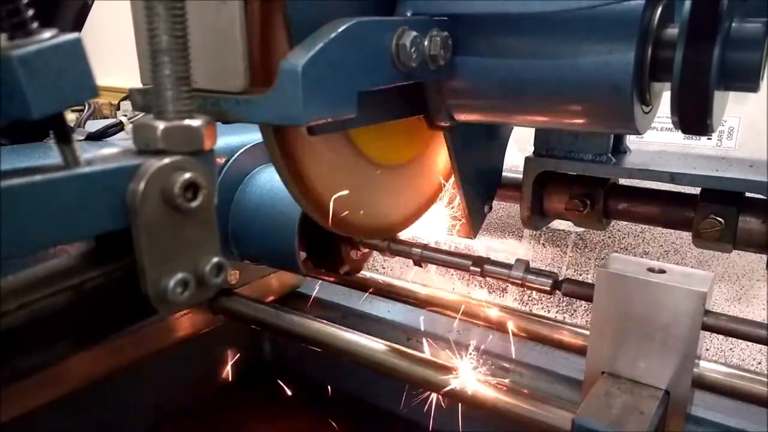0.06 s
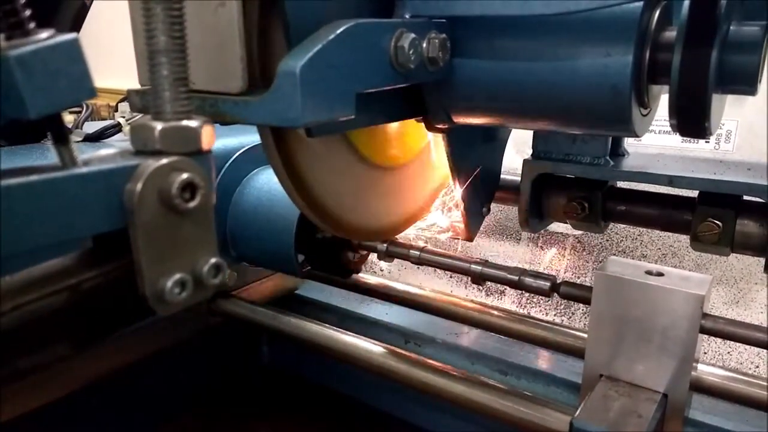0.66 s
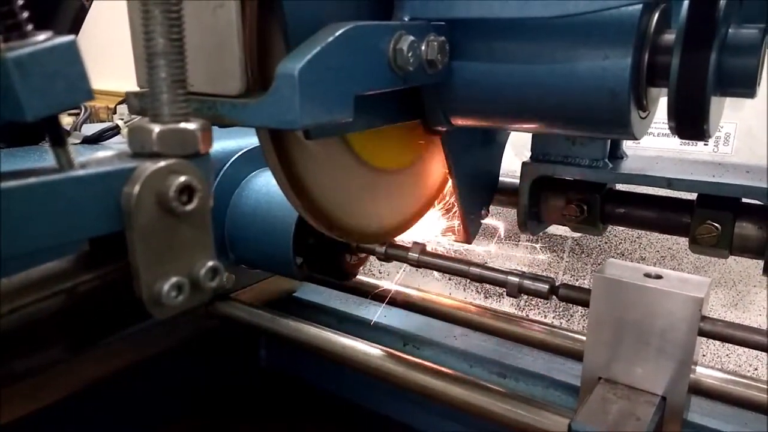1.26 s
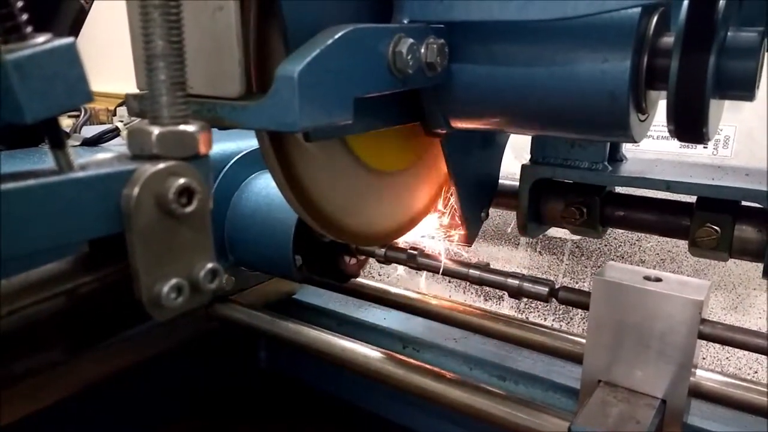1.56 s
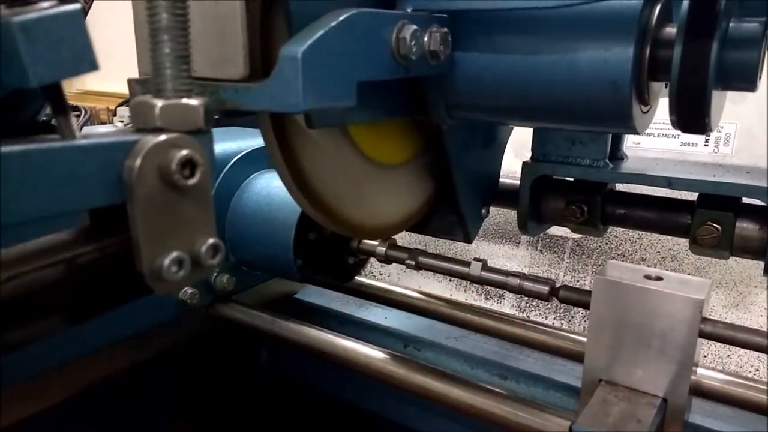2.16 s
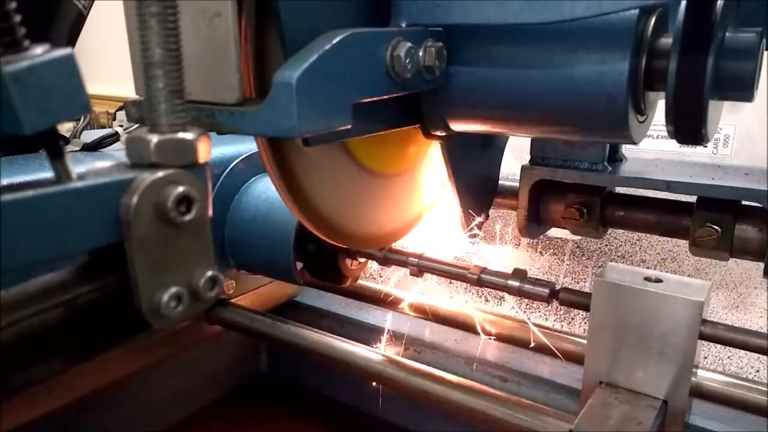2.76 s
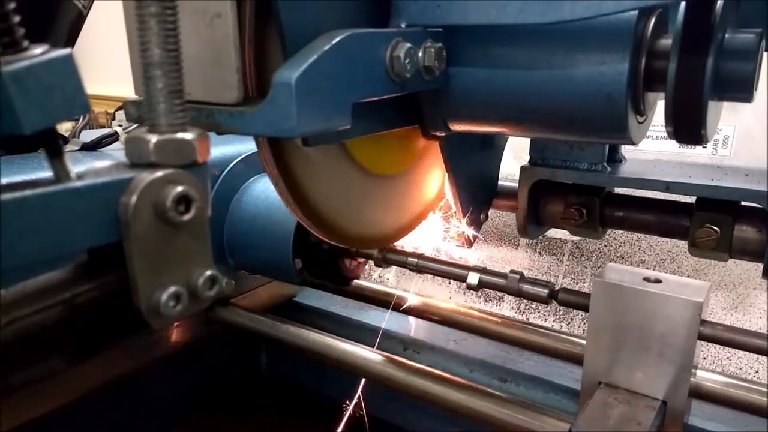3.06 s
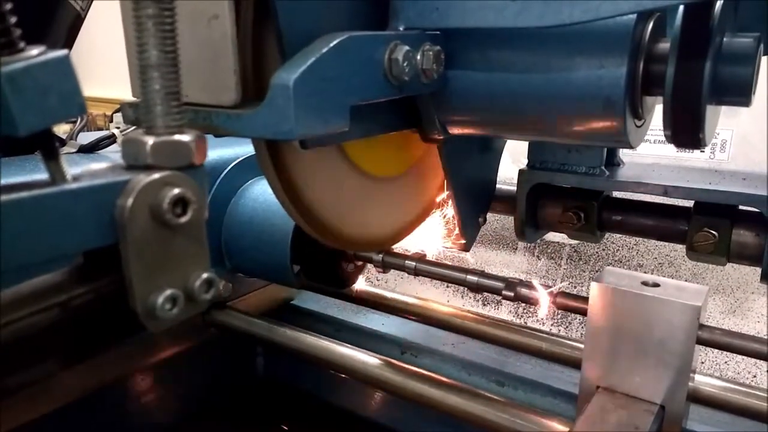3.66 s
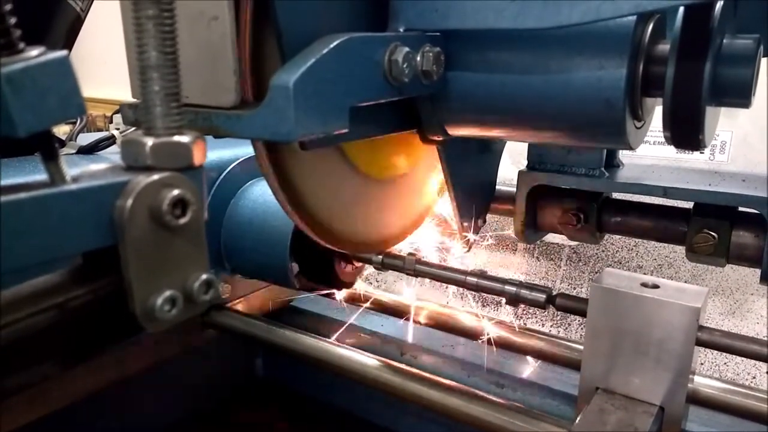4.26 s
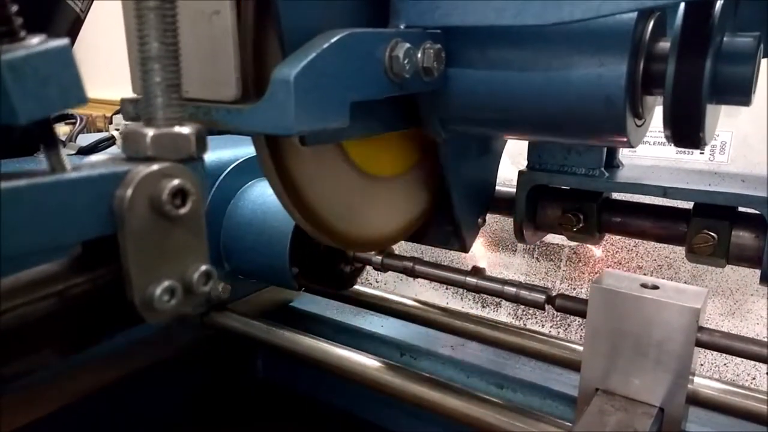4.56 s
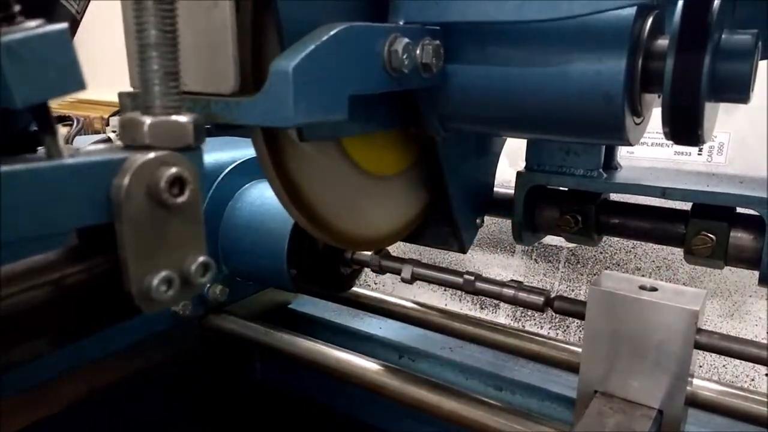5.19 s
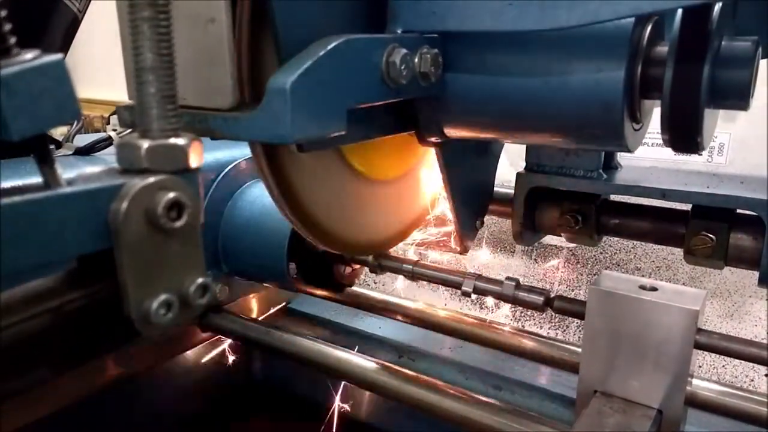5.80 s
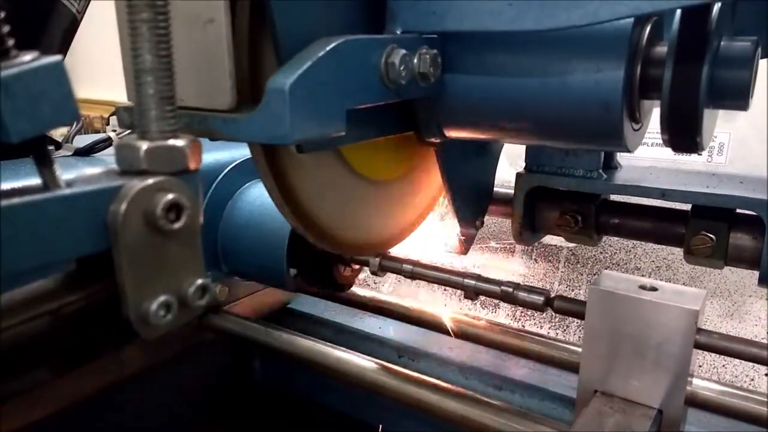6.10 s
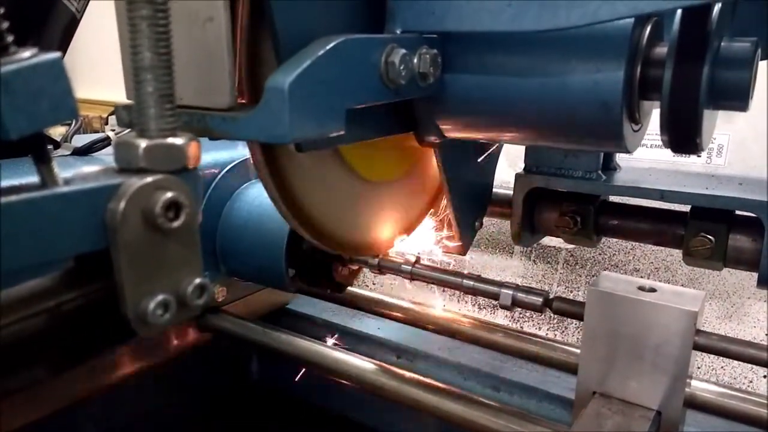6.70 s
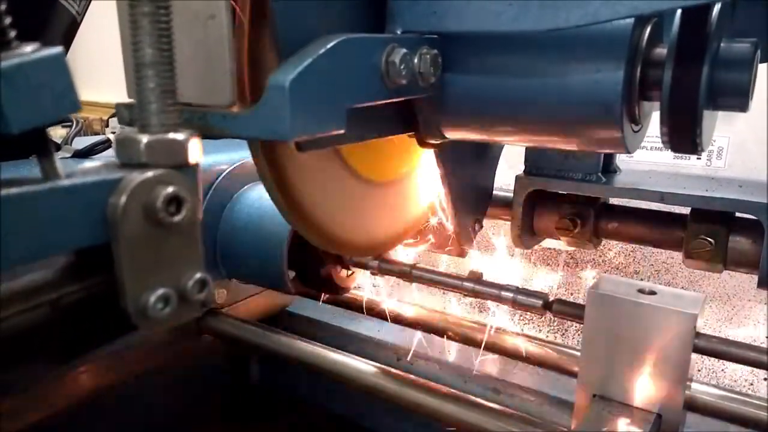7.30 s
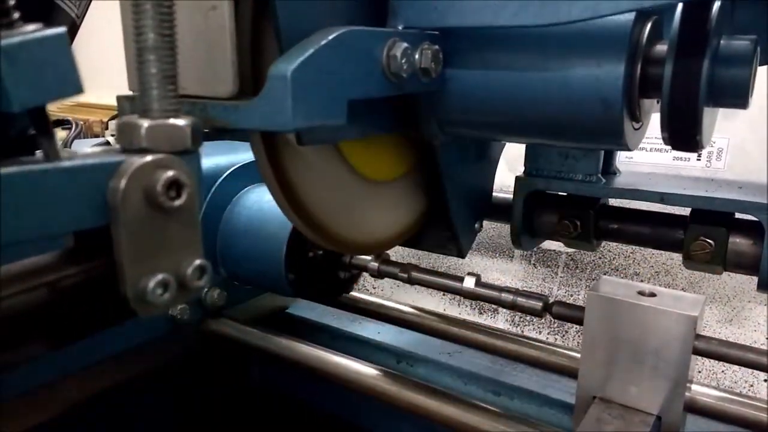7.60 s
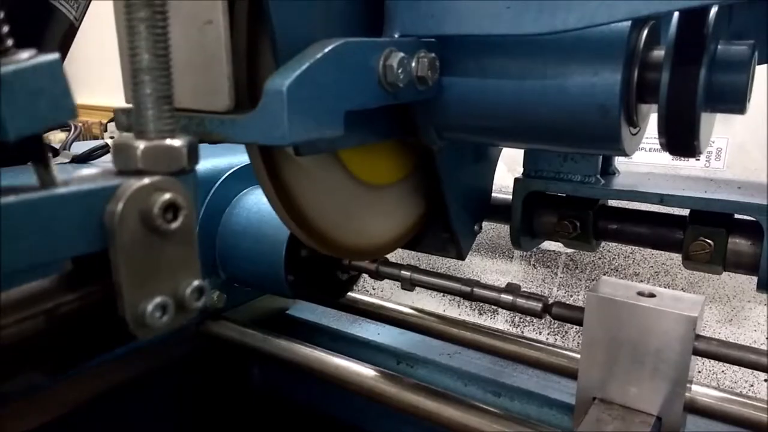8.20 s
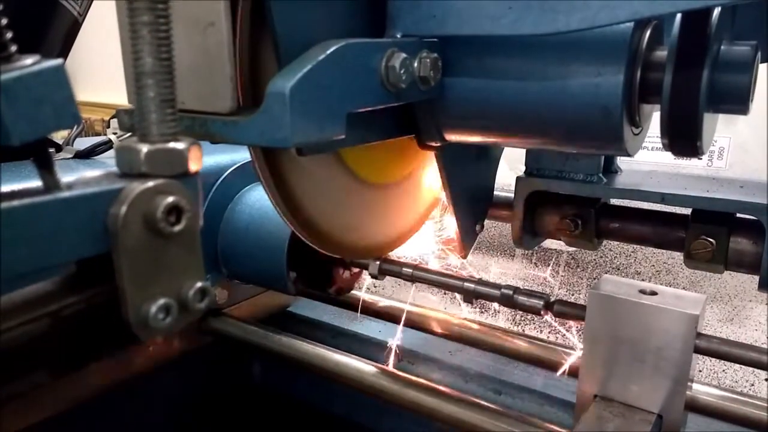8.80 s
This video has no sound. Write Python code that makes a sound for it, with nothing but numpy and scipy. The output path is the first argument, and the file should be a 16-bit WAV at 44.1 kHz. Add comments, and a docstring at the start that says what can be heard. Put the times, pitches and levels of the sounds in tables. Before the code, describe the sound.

Repeated bursts of harsh, pulsing metal grinding with a high ring, separated by short pauses where the machine hums and clatters.

```python
"""A belt-driven grinding wheel makes four passes over a small steel part, close to the microphone.
First the wheel plunges in and rebounds, over a humming motor and a rattling drive.
It bites about 14 times a second: each bite scrapes out grit and sets the steel ringing,
while chips crackle, deep digs screech and coarse grains snag. Then the wheel lifts off, the drive
knocks, and hum and rattle swell as the automatic volume control recovers, until the next pass."""
import sys
import numpy as np
from scipy import signal
from scipy.fft import irfft
from scipy.io import wavfile

SR = 44100
rng = np.random.default_rng(int(sys.argv[2]) if len(sys.argv) > 2 else 0)


def materialize(psi):
    """Save the field psi as 16-bit PCM at rate SR to the path in sys.argv[1].

    A 1-D psi becomes a single channel; in a 2-D psi each row is a channel.
    """
    bounded = np.clip(np.atleast_2d(psi).T, -1, 1)
    quanta = np.round(bounded * 32767).astype(np.int16)
    wavfile.write(sys.argv[1], SR, quanta)


N = 390285
TIME = np.arange(N) / SR
FIRST_TOUCH_S, CYCLE_S, PASS_S = -.008, 2.7653, 1.793  # a pass is the part of a cycle spent grinding
PASS_STARTS_S = np.arange(FIRST_TOUCH_S, N / SR, CYCLE_S)
RISE_SHARE = 0.43  # the share of its length that a contact takes to build up

# Levels are relative. pan_db is left minus right; lead_rad is how far the left wave runs ahead.
# strong notes of the steel part: pitch_hz, fade_by_60_db_s, pan_db, lead_rad
STEEL_NOTES = [(6381, .3, -5, -.4), (8347, .16, -1, -.1), (8847, .17, 2, -.5), (5966, .28, 0, 0)]
# weaker resonances of the part and wheel: pitch_hz, width_hz, level_db, pan_db
PART_RESONANCES = [(2052, 18, 13.5, -3), (2500, 45, 4, -2), (3924, 28, 7, -4), (4260, 30, 13, -12),
                   (4570, 45, 4, -4), (4785, 45, 8, -6), (11030, 16, 21, -1), (11610, 22, 15, -3),
                   (12520, 55, 24, -9), (12690, 110, 13, -7), (12830, 55, 19, -4), (14006, 19, 33.5, -15),
                   (14673, 22, 26.5, -5)]
# resonances of the machine's frame and guard: pitch_hz, width_hz, level_db, pan_db
FRAME_RESONANCES = [(635, 32, 3, -4), (726, 22, 15, -3), (1098, 28, 7, 0), (1128, 30, 8.5, 0),
                    (1256, 13, 15, -1), (1488, 28, 8, -3), (1860, 36, 11, 0), (2245, 55, 5, 0),
                    (2900, 45, 5, -1)]
# resonances of loose drive parts: pitch_hz, width_hz, level_db, pan_db
DRIVE_RESONANCES = [(3843, 40, 10.8, -0.5), (4390, 42, 4.9, -1)]
# tone colour of grit scraping steel: pitch_hz, level_db
GRIT_COLOUR = [(50, -19.5), (170, 2.5), (240, 7), (330, -10.5), (650, 0.5), (1400, -9), (2100, 1),
               (2550, -11.5), (4000, 4), (5500, -5), (6600, 2.5), (7500, -21.5), (9300, 5), (10200, -12.5),
               (11400, -7), (12200, -27.5), (13300, -22), (14500, -19.5), (15300, -32)]
# tone colour of small hard hits: pitch_hz, level_db
CLACK_COLOUR = [(80, -38), (250, -21), (1200, -4), (2500, 0), (4000, 5), (6000, -7), (8600, -11.5),
                (11000, -21.5), (15000, -41)]
# bites of the wheel: start_s, length_s, grit_db, then one level_db for each steel note
BITES = [(-0.014, 0.095, -9.5, -22, -23, -28, -32), (0.114, 0.042, -11.5, -18, -15.5, -17, -34),
         (0.206, 0.022, -8, -17.5, -15, -22.0, -27), (0.276, 0.034, -13, -19, -14, -15, -39),
         (0.335, 0.048, -13.5, -20.5, -18, -22, -30), (0.415, 0.034, -15.5, -15, -27.0, -25, -26),
         (0.431, 0.082, -15, -22.5, -18, -19, -33), (0.541, 0.022, -10, -18, -19, -21, -37),
         (0.591, 0.063, -15, -26, -21, -23, -34), (0.675, 0.059, -11.5, -20.5, -22, -32, -32),
         (0.739, 0.062, -13, -28.0, -15.5, -34, -33), (0.804, 0.047, -12, -26, -24, -21.5, -34),
         (0.876, 0.064, -13.5, -18, -18, -23, -36), (0.938, 0.083, -12, -22.5, -17, -25, -29),
         (1.013, 0.071, -13, -23, -23.5, -23, -23), (1.103, 0.015, -13, -21.0, -22, -26, -31),
         (1.125, 0.063, -16.5, -13, -17, -20, -33), (1.215, 0.065, -15.5, -22, -19.5, -24, -30),
         (1.295, 0.056, -13, -15, -23, -22, -25), (1.367, 0.066, -11, -16, -15.5, -24, -44),
         (1.444, 0.045, -12, -18.5, -26, -20, -47), (1.522, 0.031, -12, -23, -18, -26, -26),
         (1.552, 0.074, -13, -19.5, -17.5, -18, -35), (1.651, 0.031, -12, -28, -18.5, -20, -29),
         (1.705, 0.066, -12, -21.5, -23, -25, -29), (2.775, 0.07, -12, -17, -20.5, -24, -23),
         (2.893, 0.049, -11.5, -19, -29, -28, -26), (2.964, 0.052, -15.5, -19, -20.5, -27, -36),
         (3.035, 0.043, -12, -31, -23, -24, -36), (3.082, 0.05, -14, -14.5, -20, -29, -26),
         (3.161, 0.039, -11, -17, -23, -21, -34), (3.245, 0.03, -14.5, -26, -23, -22, -26),
         (3.297, 0.032, -11, -18, -32, -25, -33), (3.347, 0.022, -16.5, -24, -19, -27, -36),
         (3.388, 0.015, -10, -19.5, -26.0, -37, -28), (3.409, 0.043, -12.5, -22, -26, -24.5, -36),
         (3.452, 0.031, -11, -17, -20, -30, -27), (3.504, 0.057, -12.5, -18, -25, -36, -30),
         (3.582, 0.065, -14, -23, -19, -29.5, -25), (3.662, 0.035, -11, -19, -17, -19, -29),
         (3.718, 0.057, -12.5, -20, -16, -20, -34), (3.784, 0.035, -11.5, -16.0, -23, -21.0, -28),
         (3.864, 0.023, -11, -14, -19, -19, -37), (3.93, 0.053, -17, -19.5, -21, -24, -37),
         (4.009, 0.012, -13, -13, -25, -20, -35), (4.031, 0.08, -12, -16, -22, -35, -34),
         (4.109, 0.067, -11.5, -16, -24, -24, -25), (4.204, 0.017, -10.5, -21, -31, -28, -34),
         (4.249, 0.0067, -11, -15, -19, -19, -43), (4.266, 0.053, -11, -23, -24.0, -22, -36),
         (4.341, 0.05, -10, -17.5, -15.5, -31, -32), (4.417, 0.025, -10, -31, -18, -22, -30),
         (4.447, 0.11, -11.5, -26, -17, -20, -32), (5.512, 0.1, -12.5, -17.5, -19.5, -23, -32),
         (5.654, 0.022, -12.5, -21, -21, -24, -25), (5.727, 0.034, -13, -17, -20, -23, -24),
         (5.795, 0.039, -11.5, -20, -20, -21, -29), (5.86, 0.059, -11.5, -21, -20, -20, -33),
         (5.929, 0.031, -10.5, -31, -22, -23, -41), (5.978, 0.05, -13, -17.5, -26.0, -16.5, -33),
         (6.08, 0.017, -14.5, -20, -21.5, -23, -37), (6.128, 0.062, -12.5, -17.5, -29.5, -20.5, -36),
         (6.222, 0.031, -16, -17.5, -30, -18, -23), (6.281, 0.078, -12.5, -19, -18, -22.5, -28),
         (6.362, 0.1, -11, -18, -25, -18.5, -37), (6.438, 0.024, -21, -18.5, -27, -20, -33),
         (6.474, 0.063, -10, -17.5, -20, -19.5, -30), (6.553, 0.026, -10, -14.5, -26, -16, -34),
         (6.585, 0.082, -15, -14, -32, -27, -38), (6.678, 0.021, -11, -16, -22, -19, -40),
         (6.698, 0.055, -14, -17, -23, -39, -32), (6.765, 0.028, -10, -17.5, -22, -22, -32),
         (6.841, 0.015, -10.5, -13, -21, -17, -28), (6.898, 0.037, -11, -15.5, -20, -18, -32),
         (6.977, 0.066, -12.5, -14.5, -26, -18.5, -25), (7.054, 0.028, -11.5, -19, -28, -25.0, -27),
         (7.107, 0.046, -12.5, -20.5, -31, -20, -32), (7.183, 0.019, -10.5, -15.5, -20.5, -20, -32),
         (7.254, 0.0096, -7, -17, -20, -23, -32), (7.272, 0.048, -11, -15.5, -15, -23, -28),
         (8.274, 0.099, -11, -18, -17, -24, -28), (8.413, 0.049, -13, -20, -21, -23, -31),
         (8.49, 0.072, -13, -17.5, -19.5, -20, -31), (8.568, 0.037, -13, -28, -17.5, -20, -32),
         (8.63, 0.049, -15, -23, -19, -25, -24), (8.694, 0.042, -15, -20, -18.5, -23, -31),
         (8.77, 0.035, -12.5, -25, -15, -24.5, -35), (8.817, 0.033, -9.5, -25.5, -21, -27, -37)]


def amp(db):
    """Turns decibels into a multiplier."""
    return 10 ** (np.asarray(db) / 20)


def evened(x):
    """Scales a signal to an average power of 1."""
    return x / np.sqrt(np.mean(abs(x) ** 2) + 1e-20)


def drift(hz):
    """A random wander in complex numbers, no faster than about hz."""
    slow_only = np.exp(-(np.fft.fftfreq(N, 1 / SR) / hz) ** 2)
    noise = rng.standard_normal(N) + 1j * rng.standard_normal(N)
    return evened(np.fft.ifft(slow_only * noise))


def smoothed(x, seconds, start):
    """Follows x with a lag, from a starting value."""
    keep = np.exp(-1 / (seconds * SR))
    return signal.lfilter([1 - keep], [1, -keep], x, zi=[keep * start])[0]


def stereo(pan_db, lead_rad):
    """Left and right multipliers; their complex angle shifts the wave's phase."""
    side = np.array([[.5], [-.5]])
    return evened(amp(side * pan_db)) * np.exp(1j * side * lead_rad)


def resonate(force, colour, resonances, pan_db, size=16384):
    """Turns a force into sound: a broad tone colour with ringing peaks on top."""
    # left-right phase, opposite near 2 and 5 kHz: pitch_hz, lead_rad
    phase_leads = [(250, .1), (550, .4), (800, 0), (1550, -.1), (1700, -2.1), (2100, -2.5), (2950, -3.6),
                   (3100, -.1), (3900, .3), (4100, -1.1), (4350, -1.1), (4600, -2.8), (5200, -3.5),
                   (5500, 0), (9000, -.5), (10400, -2), (11000, 0), (12500, -1), (14000, -1.6), (14700, 0)]
    hz = np.fft.rfftfreq(size, 1 / SR)
    points_hz, db = np.transpose(colour)
    log_gain = np.log(amp(np.interp(np.log(hz + 1), np.log(points_hz), db)))
    mirrored = np.r_[log_gain, log_gain[-2:0:-1]]
    broad = np.exp(np.conj(signal.hilbert(mirrored)))[:len(hz)]  # the sound follows its cause
    peaks = sum(amp(peak_db) * stereo(pan, 0) / (1 + 2j * (hz - pitch) / width)
                for pitch, width, peak_db, pan in resonances)
    phase = stereo(0, np.interp(hz, *np.transpose(phase_leads)))
    response = irfft(broad * (stereo(pan_db, 0) + peaks) * phase)
    early = size // 16  # room for the side that hears a pitch first
    response = evened(np.roll(response, early, axis=1)) / np.sqrt(size)
    return signal.oaconvolve(force, response, axes=1)[:, early:early + N]


def grains(per_s, spread_db, apart):
    """Tiny random hits of uneven size; apart weights those that reach one side only."""
    sizes = amp(spread_db * np.minimum(rng.exponential(1, (3, N)), 4)) * rng.standard_normal((3, N))
    shared, left, right = sizes * (rng.random((3, N)) < per_s / SR)
    return evened(shared + apart * np.array([left, right]))


def stroke(age_s, rise_s, length_s, fall_s):
    """The strength of one contact: it rises, holds and dies away."""
    return np.clip(age_s / rise_s, 0, 1) * np.exp(-np.maximum(age_s - length_s, 0) / fall_s)


def after(start_s, seconds):
    """The samples that follow a moment."""
    return slice(max(int(start_s * SR), 0), int((start_s + seconds) * SR))


def contact(rise_s, fall_s):
    """1 while the wheel is on the steel, 0 between passes."""
    return sum(stroke(TIME - start, rise_s, PASS_S, fall_s) for start in PASS_STARTS_S)


def blows(rows, longest_rise_s, fall_s):
    """The joint strength of many contacts, given as start_s, length_s, level_db."""
    power = np.zeros(N)
    for start, length, db in rows:
        span = after(start, .5)
        rise_s = min(RISE_SHARE * length, longest_rise_s)
        power[span] += (amp(db) * stroke(TIME[span] - start, rise_s, length, fall_s)) ** 2
    return np.sqrt(power)


def motor(waver=0.031, dip_width_s=0.063):
    """Magnetic hum: firm when idling, thinner while the wheel loads the motor."""
    # tones of the hum: pitch_hz, level_db, change_under_load_db, pan_db, lead_rad
    hum_tones = [(100.4, -24, -4, -17.5, 2.13), (201.3, -20.5, -7, -6, 0.02), (378.6, -51.5, 9.5, 4, 0.15)]
    load = contact(rise_s=0.14, fall_s=0.17)
    # the hum dips briefly after the plunge and at lift-off
    dip_db = sum(db * np.exp(-((TIME - start - delay_s) / dip_width_s) ** 2)
                 for start in PASS_STARTS_S for delay_s, db in [(.14, -5.5), (1.81, -8)])
    hum = np.zeros((2, N))
    for hz, db, load_db, pan, lead in hum_tones:
        tone = np.exp(2j * np.pi * hz * TIME) * (1 + waver * drift(13))
        hum += amp(db + load_db * load) * (stereo(pan, lead) * tone).real
    return np.sqrt(2) * amp(dip_db) * hum


def rattle(level_db=-21, lumpy_db=2):
    """Belt and bearings chatter in the frame without a pause."""
    # tone colour of the chatter: pitch_hz, level_db
    rattle_colour = [(30, -7.5), (60, -4.5), (125, 12), (240, 13), (310, -0.5), (470, 3), (600, 2),
                     (900, -1.5), (1400, -1), (2200, -4), (3300, -5.5), (4200, -8.5), (6000, -16),
                     (8600, -20), (11000, -30), (15000, -41)]
    force = evened(grains(per_s=5000, spread_db=2.83, apart=0.51) * amp(lumpy_db * drift(37).real))
    return amp(level_db) * resonate(force, rattle_colour, FRAME_RESONANCES + DRIVE_RESONANCES, pan_db=-2)


def grinding(rub_db=-21, rebound_db=-10.5, settle_s=0.15, graze_db=-29.5, graze_s=0.039, fall_s=0.0085):
    """The wheel grazes, plunges in, rebounds and bites; its pressure drives scrape, shudder and screech."""
    # moments when the wheel digs in deep: start_s, length_s, level_db
    digs = [(0.008, 0.04, -21), (0.416, 0.015, -11.5), (1.535, 0.019, -12), (1.733, 0.056, -14.5),
            (2.815, 0.027, -6), (3.177, 0.022, -16), (3.671, 0.04, -10), (3.731, 0.025, -16),
            (4.081, 0.019, -20), (4.353, 0.033, -18), (5.522, 0.065, -16), (5.877, 0.035, -17),
            (6.318, 0.022, -12), (6.387, 0.03, -21), (6.44, 0.021, -24), (7.062, 0.023, -11.5),
            (7.118, 0.036, -12), (7.275, 0.02, -5), (8.29, 0.024, -22), (8.524, 0.025, -14.0),
            (8.777, 0.03, -15.0)]
    graze = sum(amp(graze_db) * stroke(TIME - start + graze_s, 0.012, graze_s, fall_s)
                for start in PASS_STARTS_S)
    rebound = np.exp(-((TIME - FIRST_TOUCH_S) % CYCLE_S / settle_s) ** 2)
    rub = amp(rub_db + rebound_db * rebound) * contact(0.0037, fall_s)
    bite = blows([row[:3] for row in BITES], longest_rise_s=.016, fall_s=fall_s)
    dig = blows(digs, longest_rise_s=.016, fall_s=fall_s)
    power = graze ** 2 + rub ** 2 + bite ** 2
    # strain grows with the square of the pressure, so only heavy bites and digs count
    strain = np.hypot(power, amp(-9) * dig)
    screech_force = np.hypot(amp(2) * power, amp(-2) * dig)
    return scrape(np.sqrt(power)) + shudder(strain) + rasp(strain) + screech(screech_force)


def scrape(pressure, level_db=-3, wheel_turns_per_s=43.8, wobble=0.12, flutter_db=2.3):
    """Grit scratches the steel; the wheel runs slightly out of true, so it throbs once a turn."""
    throb = 1 + wobble * np.sin(2 * np.pi * wheel_turns_per_s * TIME)
    flutter = amp(flutter_db * drift(130).real)
    force = pressure * throb * flutter * grains(per_s=30000, spread_db=1.33, apart=0.98)
    return amp(level_db) * resonate(force, GRIT_COLOUR, FRAME_RESONANCES + PART_RESONANCES, pan_db=-2.5)


def shudder(strain, level_db=-2):
    """Heavy bites and digs shake the machine's frame."""
    # tone colour of the shaking frame: pitch_hz, level_db
    shudder_colour = [(50, -44), (140, 18), (260, -10.5), (750, 9.5), (1300, -4), (2400, 6.5), (4100, -2.5),
                      (6000, -23), (15000, -38)]
    force = strain * grains(per_s=8000, spread_db=2.1, apart=0.2)
    return amp(level_db) * resonate(force, shudder_colour, FRAME_RESONANCES + PART_RESONANCES, pan_db=3)


def ringing(level_db=0.18, roughness=0.56, detune_hz=4, damping_s=0.035, hold_s=0.01):
    """Each bite damps the old ring and starts a new one; after a pass the steel rings out freely."""
    out = np.zeros((2, N))
    next_starts = [row[0] for row in BITES[1:]] + [np.inf]
    for k, (hz, fade_s, pan, lead) in enumerate(STEEL_NOTES):
        note = np.zeros(N, complex)
        touching = np.zeros(N)
        for (start, length, _, *notes_db), next_start in zip(BITES, next_starts):
            phase, shift = rng.uniform(-0.27, 1, 2)
            span = after(start, .5)
            age = TIME[span] - start
            ring = stroke(age, RISE_SHARE * length, length + hold_s, fade_s / np.log(1000))
            ring *= np.exp(-np.maximum(TIME[span] - next_start, 0) / damping_s)
            tone = np.exp(1j * np.pi * (phase + 2 * (hz + detune_hz * shift) * age))
            note[span] += amp(notes_db[k]) * ring * tone
            touching[span] += stroke(age, 0.00085, length, 0.0032)
        note *= 1 + roughness * np.minimum(touching, 1) * drift(52)  # touching grit roughens the note
        out += np.sqrt(2) * (stereo(pan, lead) * note).real
    return amp(level_db) * out


def chips(level_db=-28):
    """Chips and loose grit crackle against the guard while the wheel cuts."""
    force = contact(rise_s=0.004, fall_s=0.0087) * grains(per_s=130, spread_db=3.5, apart=1)
    return amp(level_db) * resonate(force, CLACK_COLOUR, FRAME_RESONANCES, pan_db=3)


def rasp(strain, level_db=-1):
    """Under strain the part gives a harsh noise around the pitch of its screech."""
    # resonances near the screech: pitch_hz, width_hz, level_db, pan_db
    rasp_resonances = [(3930, 50, 12, -4), (4130, 90, 7, -6), (4263, 26, 17, -12)]
    force = strain * grains(per_s=8000, spread_db=2, apart=0.87)
    return amp(level_db) * resonate(force, GRIT_COLOUR, rasp_resonances, pan_db=17)


def screech(force, roughness=0.46, wander_hz=6, ring_s=0.0061):
    """The wheel forces out the part's lowest strong note: rough, unsteady, ringing on briefly."""
    # the screeching note: pitch_hz, pan_db, lead_rad
    screech_note = (4261, -9, -1.1)
    hz, pan, lead = screech_note
    cycles = np.cumsum(hz + wander_hz * drift(19.9).real) / SR
    swell = np.sqrt(smoothed(force ** 2, ring_s, 0))
    note = swell * evened(1 + roughness * drift(66)) * np.exp(2j * np.pi * cycles)
    return np.sqrt(2) * (stereo(pan, lead) * note).real


def snags(level_db=-8, ping_db=15, ping_width_hz=16):
    """A coarse grain catches on the steel, making a sudden bright scratch and pinging its notes."""
    # snagging grains, mostly as a bite begins: start_s, level_db
    snag_moments = [(0.128, -4), (0.209, -8), (0.281, -9), (0.418, -6), (0.449, -12), (0.545, -11),
                    (0.594, -10), (0.692, -12), (0.834, -7), (0.905, -21), (0.96, -25), (1.071, -14),
                    (1.141, -11), (1.166, -5), (1.212, -3), (1.24, -15), (1.284, -14), (1.309, -15),
                    (1.381, -5), (1.451, -9), (1.501, -3.5), (1.651, -7), (1.734, -15), (2.762, -7),
                    (2.893, -2.5), (2.971, -20), (3.042, -13), (3.111, -8.5), (3.171, -7), (3.35, -11),
                    (3.422, -15), (3.448, -15), (3.516, -4), (3.586, -11), (3.638, -11), (3.67, -17),
                    (3.803, -12), (3.861, -12), (3.931, -9), (4.182, -9), (4.21, -8), (4.252, -11),
                    (4.288, -7), (4.35, -8), (4.494, -5), (5.516, -9), (5.655, -7), (5.727, -8),
                    (5.824, -14), (5.945, -8), (6.065, -7), (6.136, -18), (6.226, -10), (6.255, -5),
                    (6.327, -9), (6.423, -4), (6.492, -15), (6.563, -7), (6.634, -2), (6.672, -10),
                    (6.767, -7), (6.847, -8), (6.922, -5), (6.98, -13), (7.017, -6), (7.065, -5),
                    (7.138, -8), (7.184, -6), (7.254, -8), (8.282, -6), (8.42, -12), (8.575, -6),
                    (8.645, -9), (8.703, -7), (8.741, -10), (8.777, -7)]
    # tone colour of the scratch: pitch_hz, level_db
    scratch_colour = [(100, -20), (700, -2), (2000, -8), (4000, 2.5), (5500, 0), (7500, -12.5), (9300, 10),
                      (10200, -7), (11400, -3.5), (12200, -20), (13300, -16), (14500, -15), (15300, -24)]
    power = np.zeros(N)
    for start, db in snag_moments:
        span = after(start, .2)
        catch = stroke(TIME[span] - start, rise_s=.001, length_s=0.0058, fall_s=0.016)
        power[span] += (amp(db) * catch) ** 2
    force = np.sqrt(power) * grains(per_s=20000, spread_db=1.5, apart=0.91)
    pings = [(hz, ping_width_hz, ping_db, pan) for hz, _, pan, _ in STEEL_NOTES]
    return amp(level_db) * resonate(force, scratch_colour, PART_RESONANCES + pings, pan_db=0.5)


def knocks(clatter_db=-10, thud_db=-6.5, fall_s=0.0097):
    """Slack in the drive is taken up in short blows: loose parts clatter and the frame thuds."""
    # blows between passes: start_s, length_s, clatter_db, thud_db
    hits = [(1.838, 0.011, -12.5, -19), (1.921, 0.011, -13.5, -12), (1.953, 0.034, -20, -23),
            (1.992, 0.0057, -5, -9), (2.022, 0.0049, -13, -16), (2.048, 0.015, -13, -19),
            (2.102, 0.006, -15, -10.5), (2.168, 0.0097, -7.5, -10), (2.21, 0.0072, -14, -14),
            (2.241, 0.018, -9.5, -10), (2.308, 0.0097, -13, -17), (2.335, 0.018, -12.5, -11),
            (2.404, 0.01, -6, -10), (2.452, 0.016, -16, -14.5), (2.469, 0.007, -7.5, -18),
            (2.504, 0.03, -16.5, -16), (2.566, 0.02, -14.5, -14), (2.587, 0.024, -14, -13),
            (2.663, 0.012, -8.5, -5.5), (2.74, 0.006, -6, -9.5), (4.66, 0.018, -16, -15),
            (4.804, 0.018, -13, -14), (4.88, 0.026, -10, -9.5), (4.928, 0.016, -20, -12.5),
            (4.958, 0.02, -9, -15), (5.001, 0.01, -10, -11), (5.045, 0.008, -12, -19.5),
            (5.064, 0.025, -13.5, -17), (5.088, 0.014, -10, -14), (5.131, 0.023, -15, -12),
            (5.164, 0.005, -9, -10), (5.219, 0.026, -10.5, -10), (5.305, 0.0046, -2, -5.5),
            (5.33, 0.011, -15, -13.5), (5.375, 0.007, -4, -5), (5.407, 0.018, -10.5, -11.5),
            (5.455, 0.008, -9, -9), (5.475, 0.016, -11, -13), (5.497, 0.006, -8, -8),
            (7.402, 0.01, -9, -17), (7.432, 0.043, -11.5, -11.5), (7.503, 0.018, -21, -25),
            (7.521, 0.011, -13, -16), (7.54, 0.008, -13, -21), (7.578, 0.032, -12, -12.5),
            (7.648, 0.024, -15, -25), (7.702, 0.008, -11.5, -14), (7.73, 0.011, -17, -18),
            (7.775, 0.011, -12, -13), (7.804, 0.0055, -13, -17), (7.846, 0.032, -14.5, -12),
            (7.936, 0.0064, -8, -9), (7.973, 0.0089, -16, -14), (7.994, 0.011, -9, -9),
            (8.046, 0.0096, -10, -7), (8.082, 0.0062, -16, -12), (8.109, 0.0031, -14, -9),
            (8.182, 0.016, -9, -8.5), (8.224, 0.015, -13, -19), (8.252, 0.013, -6, -5.5)]
    # tone colour of the frame's thud: pitch_hz, level_db
    thud_colour = [(50, -22), (130, 8), (240, 4.5), (330, 0), (700, -0.5), (1300, -1), (2200, 4.5),
                   (4000, -30), (15000, -73)]
    clatter_force = blows([row[:3] for row in hits], 0.0032, fall_s)
    clatter_force = clatter_force * grains(per_s=11000, spread_db=3.7, apart=1)
    thud_force = blows([(start, length, db) for start, length, _, db in hits], 0.0054, fall_s)
    thud_force = thud_force * grains(per_s=9000, spread_db=1.8, apart=0.14)
    clatter = resonate(clatter_force, CLACK_COLOUR, FRAME_RESONANCES + DRIVE_RESONANCES, pan_db=-2.5)
    thud = resonate(thud_force, thud_colour, FRAME_RESONANCES, pan_db=-2.5)
    return amp(clatter_db) * clatter + amp(thud_db) * thud


def workshop(sound, fade_s=.35, cutoff_hz=4000):
    """The room's short, dull echo, different on each side."""
    t = TIME[:SR // 2]
    tail = rng.standard_normal((2, len(t))) * amp(-60 * t / fade_s) * (t > .004)
    tail = signal.lfilter(*signal.butter(1, cutoff_hz, fs=SR), evened(tail) / np.sqrt(len(t)))
    return signal.oaconvolve(sound, tail, axes=1)[:, :N]


def scene(room_db=-13):
    """The machine at arm's length in a small workshop."""
    noises = grinding() + snags() + chips() + rattle() + knocks()
    return noises + amp(room_db) * workshop(noises) + ringing() + motor()


def record(dry, threshold_db=-32, slope=0.5, attack_s=0.037, recover_s=0.95, gain_db=-7, top_hz=15350):
    """Loud treble turns the volume down until it recovers; the lowest and highest pitches are cut."""
    treble = signal.sosfilt(signal.butter(6, 3000, "high", fs=SR, output="sos"), dry)
    treble_db = 10 * np.log10(smoothed((treble ** 2).mean(0), .02, 0) + 1e-12)
    cut_db = slope * np.maximum(treble_db - threshold_db, 0)
    release = np.exp(-TIME / recover_s)
    held_db = np.maximum.accumulate(cut_db / release) * release  # each cut fades, quickly at first
    levelled = dry * amp(gain_db - smoothed(held_db, attack_s, start=7))
    levelled = signal.sosfilt(signal.butter(2, 40, "high", fs=SR, output="sos"), levelled)
    low_pass = signal.firwin(511, top_hz, window=("kaiser", 9), fs=SR)
    return signal.oaconvolve(levelled, low_pass[None], "same")


dry = scene()
out = record(dry)
materialize(out)
```